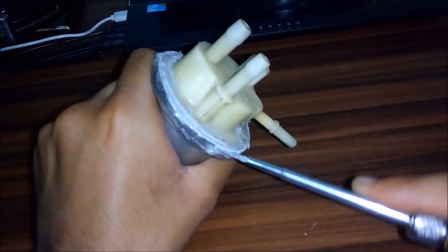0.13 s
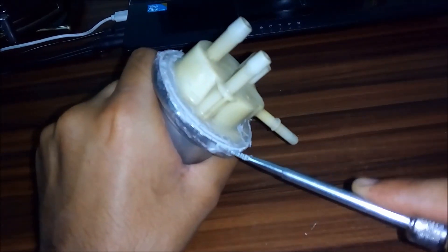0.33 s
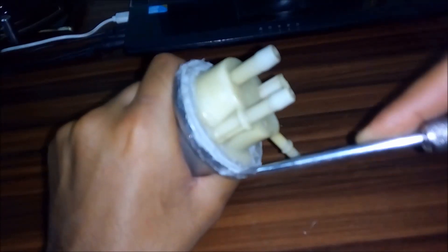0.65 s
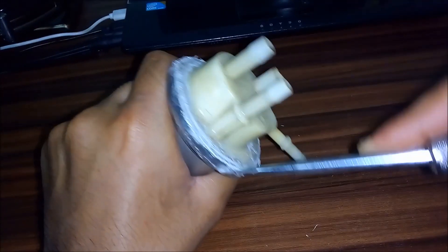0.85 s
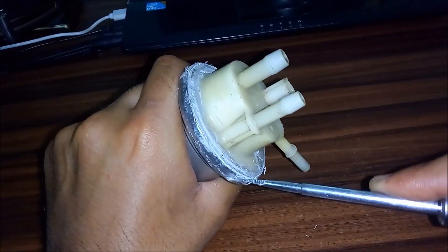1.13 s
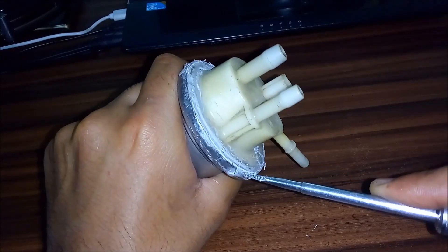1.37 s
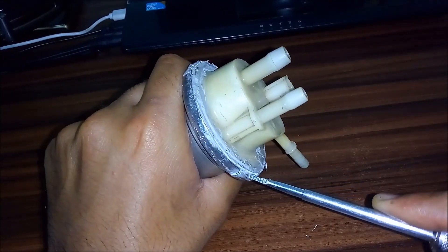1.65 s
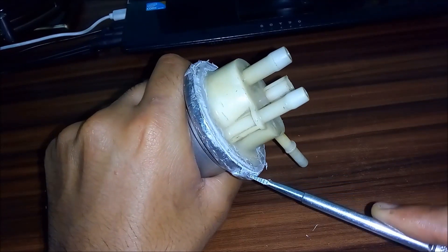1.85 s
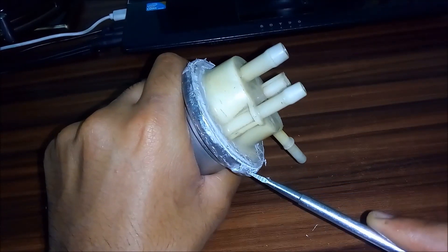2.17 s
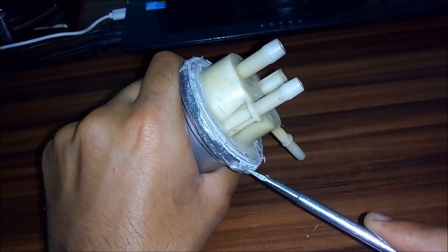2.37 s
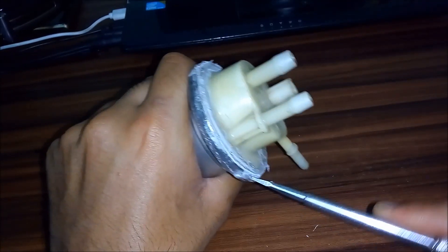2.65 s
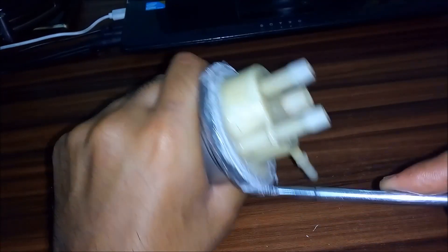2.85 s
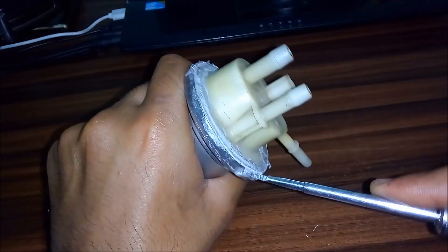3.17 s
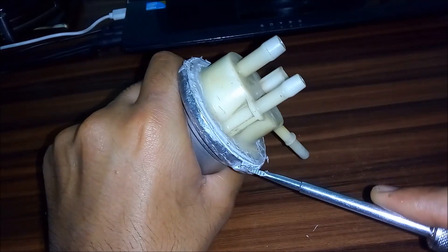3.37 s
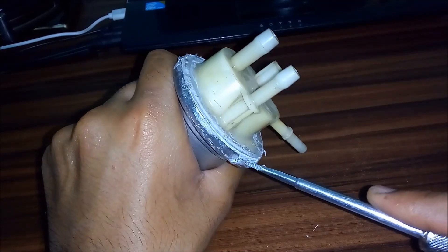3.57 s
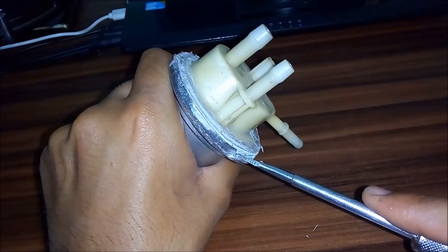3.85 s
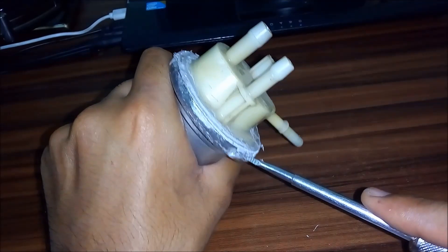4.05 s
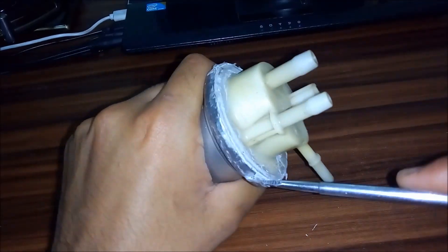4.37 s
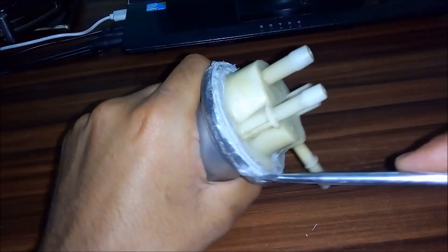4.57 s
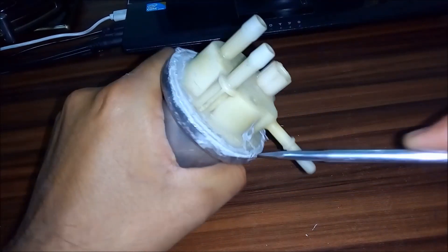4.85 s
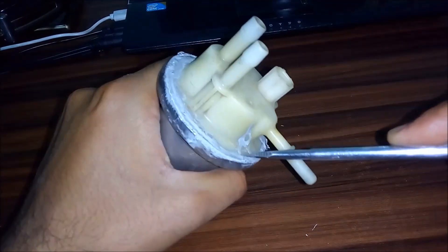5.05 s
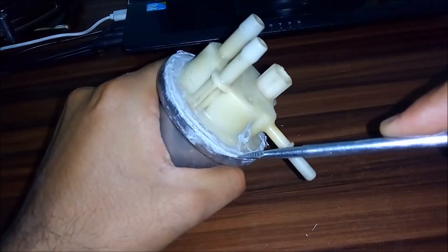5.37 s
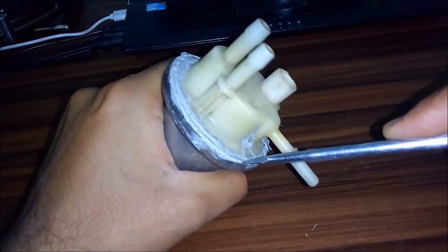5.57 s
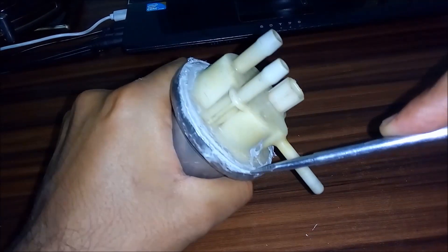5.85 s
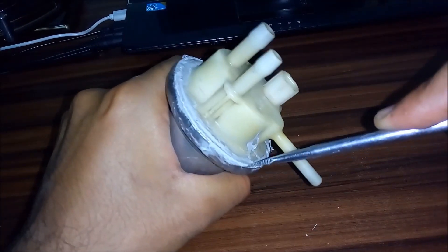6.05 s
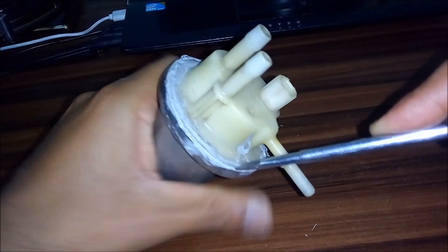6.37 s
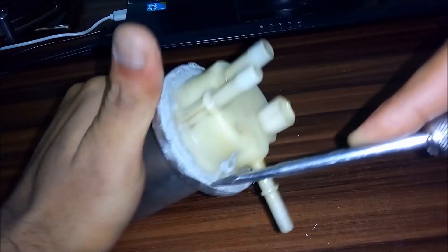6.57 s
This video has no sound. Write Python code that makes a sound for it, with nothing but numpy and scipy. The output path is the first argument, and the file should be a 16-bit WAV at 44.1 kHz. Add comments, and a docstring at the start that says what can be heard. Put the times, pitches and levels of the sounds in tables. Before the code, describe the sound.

A nearby stereo microphone catches short hard steel clicks with brief ring, dry gritty scrapes of a blade tip, and boomy wooden knocks as a pump rocks on a desk. It starts sparsely, with quiet gaps, peaks in one sharp crack and one loud thump, becomes busy with knocks and juddering scrapes, then thins to small ticks and a last soft bump. Low room noise and hiss continue.

```python
"""Prying at a steel rim

A flat screwdriver pries at the crimped steel rim of a small pump held on a wooden desk, close to a phone.
Bright clicks are short pushes that set off a crack and a steel ring; the blade also rubs, rasps and taps.
The pump knocks and drags on the desk, which booms in a small room, and the hand bumps softly.
Under it lie a faint room rumble and the hiss of two microphones, all made from filtered noise."""
import sys
import numpy as np
from scipy import signal
from scipy.fft import rfft, irfft
from scipy.io import wavfile

SR = 44100
rng = np.random.default_rng(int(sys.argv[2]) if len(sys.argv) > 2 else 0)


def materialize(psi):
    """Save the field psi as 16-bit PCM at rate SR to the path in sys.argv[1].

    A 1-D psi becomes a single channel; in a 2-D psi each row is a channel.
    """
    bounded = np.clip(np.atleast_2d(psi).T, -1, 1)
    quanta = np.round(bounded * 32767).astype(np.int16)
    wavfile.write(sys.argv[1], SR, quanta)


N = 295934  # length of the scene in samples
RING = 32768  # length of one response in samples
T = np.arange(RING) / SR
HZ = np.maximum(np.arange(RING // 2 + 1) * SR / RING, 1)


def undb(db):
    """Turn decibels into a gain."""
    return 10 ** (np.asarray(db) / 20)


def add(track, start_s, sound):
    """Mix a sound into the track at start_s seconds."""
    start = max(int(start_s * SR), 0)
    track[:, start:start + sound.shape[1]] += sound[:, :N - start]


def pan(left_minus_right_db):
    """Gains of the two microphones for a left-minus-right difference."""
    return undb(np.array([[left_minus_right_db], [-left_minus_right_db]]) / 2)


def fade(t60_s, t=T):
    """Exponential decay that falls by 60 dB in t60_s seconds."""
    return np.exp(-np.log(1000) * t / t60_s)


def spectrum(points, hz):
    """Join (pitch_hz, level_db) points into a curve on a log-frequency axis."""
    at_hz, level_db = np.transpose(points)
    return np.interp(np.log(np.maximum(hz, 1)), np.log(at_hz), level_db)


def noise(points, size, channels=2):
    """Unrelated rows of noise, coloured by a spectrum."""
    hz = np.arange(size // 2 + 1) * SR / size
    white = rng.standard_normal((channels, size))
    return irfft(rfft(white) * undb(spectrum(points, hz)), size)


def pulse(level_db):
    """The most compact pulse that starts at time zero and has these levels over HZ (minimum phase)."""
    cepstrum = irfft(level_db * np.log(10) / 20)
    # doubling the first half and dropping the second leaves nothing before time zero
    fold = 1 + np.sign(RING / 2 - np.arange(RING)) * (T > 0)
    return irfft(np.exp(rfft(cepstrum * fold)))


def through(x, response):
    """Send a sound through a response (convolution along time)."""
    return signal.fftconvolve(np.atleast_2d(x), np.atleast_2d(response), axes=1)


def contact(tilt_db, pivot_hz, cut_hz, q):
    """Push of one contact: more tilt is brighter; bass falls off below a resonance of sharpness q."""
    slope_db = tilt_db * np.clip(np.log2(HZ / pivot_hz), -3, 3)
    ratio = cut_hz / HZ
    bass_loss_db = 10 * np.log10((1 - ratio ** 2) ** 2 + (ratio / q) ** 2)
    return pulse(slope_db - bass_loss_db)


def rounded(push, top_hz, order):
    """A longer contact takes away the treble above top_hz."""
    treble_loss_db = 10 * np.log10(1 + (HZ / top_hz) ** (2 * order))
    return through(push, pulse(-treble_loss_db))[:, :RING]


def ring(modes, shift_s=0):
    """Sum of decaying modes; neighbours start in opposite directions, and shift_s moves them opposite ways."""
    total = 0
    for k, (hz, level_db, t60_s) in enumerate(modes):
        sign = (-1) ** k
        swing = np.sin(2 * np.pi * hz * (T + sign * shift_s))
        total = total + sign * undb(level_db) * swing * fade(t60_s)
    return total


def ports(x, lag_s):
    """The sound reaches the right microphone lag_s after the left."""
    return np.array([x, np.interp(T - lag_s, T, x, left=0)])


def room_tail(points, build_s, alike_hz=1300):
    """Dense reflections build up and die, the treble sooner; only the bass is alike at both microphones."""
    room_t60_s, treble_t60_s = 0.52, 0.34
    left, other = rfft(noise(points, RING))
    alike = 1 / (1 + (HZ / alike_hz) ** 2)
    field = np.array([left, alike * left + np.sqrt(1 - alike ** 2) * other])
    bass = 1 / (1 + (HZ / 2000) ** 2)
    tail = irfft(field * bass) * fade(room_t60_s) + irfft(field * (1 - bass)) * fade(treble_t60_s)
    return tail * (1 - np.exp(-T / build_s))


def stick_slip(per_s, scatter_db):
    """Friction force of unit power: tiny catches at random moments, in either direction and of uneven size."""
    caught = rng.random(RING) < per_s / SR
    direction = rng.choice([-1, 1], RING)
    catches = caught * direction * undb(scatter_db * rng.standard_normal(RING))
    return catches / np.std(catches)


def stroke_level(sound, level_db, length_s):
    """Scale a stroke so that its energy, spread over its length, has this level."""
    energy = np.mean(np.sum(sound ** 2, axis=1))
    return sound * undb(level_db) / np.sqrt(energy / (length_s * SR))


def rim_clicks(echo_s=0.0021, echo_db=-13, room_db=0, chatter_db=-26, chatter_s=0.0045):
    """The blade lets go of the rim: a hard crack, brief chatter, an echo off the desk, steel ring and room."""
    # blade slips: start_s, level_db, tilt_db_per_octave, contact_hz (resonance), top_hz (treble limit),
    # left_minus_right_db (before the right-hand shade), ring_db (ring, room and chatter against the crack)
    slips = [(0.014, -48, 12, 6500, 7900, 32, 2.5), (0.2210, -22.5, 3.5, 2360, 14900, 3.5, 1.5),
             (0.357, -44.5, 9, 2980, 11000, 13, 6), (1.235, -48, 2.5, 2730, 6950, 5, 11),
             (2.3694, -5.5, -1.5, 550, 14000, 3, 0), (2.988, -30, 10.5, 7820, 7660, 11.5, 4),
             (3.576, -46.5, 0.5, 6700, 11150, 1.5, 2.5), (3.7996, -15, 1, 1860, 14700, 6, 0.5),
             (4.213, -15, 1.5, 1500, 18400, -4.5, 4), (4.2144, -32, 15.5, 2190, 15000, 11, 8.5),
             (4.2641, -36.5, 0, 2050, 9100, 0, 14), (5.231, -46.5, -6, 4800, 8000, 1.5, 5.5),
             (5.5987, -42, 2, 2510, 11000, 7.5, 6), (5.918, -51, 2, 7150, 10900, 0.5, -2),
             (6.577, -42.5, -9, 6800, 8000, 1, 7)]
    # ringing of rim and blade: pitch_hz, level_db, t60_s (time to fall by 60 dB)
    steel_modes = [(1710, -39.5, 0.12), (1960, -36.5, 0.024), (1703, -45, 0.25), (2420, -52.5, 0.03),
                   (2600, -38, 0.014), (3200, -38, 0.019), (4270, -38, 0.031), (3940, -35, 0.031),
                   (4010, -52, .33), (4013, -55.5, 0.32), (4830, -52, 0.017), (5160, -37.5, 0.045),
                   (5670, -37, 0.06), (6000, -48.5, 0.042), (6500, -37.5, 0.13), (5970, -54, .2),
                   (7250, -46, 0.04), (6700, -46, 0.11)]
    # first crack of the rim, also the colour of its chatter: pitch_hz, level_db
    crack_colour = [(200, -67), (1100, -60), (2000, 2), (3000, -23), (4100, 1.5), (5200, 4), (6400, 16.5),
                    (7200, 13), (8000, -1.5), (9200, -14.5), (15000, -11.5)]
    # room tail after a click: pitch_hz, level_db
    tail_colour = [(100, -21), (250, -24), (600, -45), (1200, -49.5), (1750, -40), (3000, -43), (4000, -33),
                   (4600, -38), (6600, -25), (7400, -31), (8800, -61.5), (15000, -56)]
    # the right microphone faces away from the rim and misses part of its treble: pitch_hz, level_db
    right_shade = [(4500, 4), (5500, -2.5), (6500, -8), (7500, -10), (9000, -1)]
    # a firm blade damps the contact: firm_q is the sharpness at 0 dB, doubled for every 10 dB less
    firm_q, q_doubling_db = 0.18, 10
    lag_s = 0.000035
    out = np.zeros((2, N))
    crack = pulse(spectrum(crack_colour, HZ))
    echo = undb(echo_db) * np.interp(T - echo_s, T, crack, left=0)
    snap = ports(crack + echo, lag_s)
    room = undb(room_db) * room_tail(tail_colour, build_s=0.0038)
    rings = ports(ring(steel_modes), lag_s) + room
    for start_s, level_db, tilt_db, contact_hz, top_hz, pan_db, ring_db in slips:
        chatter = undb(chatter_db) * noise(crack_colour, RING) * np.exp(-T / chatter_s)
        q = firm_q * 2 ** (-level_db / q_doubling_db)
        push = rounded(contact(tilt_db, 7200, contact_hz, q), top_hz, order=4)
        response = snap + undb(ring_db) * (rings + chatter)
        add(out, start_s, undb(level_db) * pan(pan_db) * through(push, response))
    shaded_right = through(out[1], pulse(spectrum(right_shade, HZ)))[0, :N]
    return np.array([out[0], shaded_right])


def rubs(width_hz=35, lag_s=0.00006):
    """Steel catching on steel keeps two bending modes of the blade faintly alive; each rub bites, then eases."""
    # blade rubs along the rim, its ring sliding with the contact:
    # start_s, length_s, pitch_hz, slide_hz_per_s, level_db
    strokes = [(0, 0.32, 1610, -380, -66.5), (0.295, .12, 1530, -1700, -69), (0.818, 0.54, 1600, -350, -82),
               (3.064, 0.083, 1730, 6, -75), (4.622, 0.6, 1720, 11, -77), (5.388, 0.083, 1700, 4, -77.5)]
    attack_s = 0.0054
    upper_ratio, upper_db = 1.17, -12  # second bending mode against the first
    out = np.zeros((2, N))
    for start_s, length_s, hz, slide_hz_per_s, level_db in strokes:
        pressure = np.minimum(T / attack_s, 1) * np.sqrt(np.maximum(1 - T / length_s, 0))
        force = pressure * stick_slip(per_s=1500, scatter_db=2)
        swing = through(force, np.exp(-np.pi * width_hz * T))[0, :RING]
        phase = 2 * np.pi * np.cumsum(hz + slide_hz_per_s * T) / SR
        modes = np.sin(phase) + undb(upper_db) * np.sin(upper_ratio * phase)
        add(out, start_s, stroke_level(ports(swing * modes, lag_s), level_db, length_s))
    return out


def burrs(length_s, hz, spread_octaves):
    """The tip skips from burr to burr; each spot rings briefly at a pitch of its own."""
    burrs_per_s, t60_s, scatter_db = 480, 0.018, 3.5
    out = np.zeros((1, N))
    t = T[:int(t60_s * SR)]
    count = int(length_s * burrs_per_s) + 1
    chance = rng.standard_normal((256, 3))
    for k, (shift, detune, size) in enumerate(chance[:count]):
        start_s = (k + 0.5 * shift) / burrs_per_s
        # pressure swells and eases over the stroke
        pressure = np.sqrt(np.sin(np.pi * (k + 0.5) / (length_s * burrs_per_s + 1)))
        spot_hz = hz * 2 ** (spread_octaves * detune)
        spot = np.sin(2 * np.pi * spot_hz * t) * fade(t60_s, t)
        add(out, start_s, pressure * undb(scatter_db * size) * spot[None])
    return out[:, :RING]


def tip(lag_s=0.00003, room_db=-34):
    """The blade's tip rasps over burrs and its edge taps the rim lightly, heard close and from the room."""
    # rasps over burrs on the rim: start_s, length_s, centre_hz, spread_octaves, level_db
    rasps = [(0, 0.075, 1817, 0.17, -58.5), (0.005, 0.13, 4020, 0.15, -68), (0.682, 0.02, 1850, 0.19, -58),
             (0.833, 0.17, 1730, 0.12, -76), (3.194, 0.033, 1740, 0.37, -57),
             (4.406, 0.052, 2160, 0.32, -55), (4.458, 0.028, 1800, 0.28, -64),
             (4.496, 0.041, 1915, 0.45, -58.5), (4.579, 0.012, 1500, 0.21, -62.5),
             (4.657, 0.065, 1220, 0.34, -67), (4.788, 0.091, 1665, 0.3, -51.5),
             (4.947, 0.044, 1910, 0.38, -57), (4.795, 0.094, 3100, 0.17, -60),
             (4.781, 0.082, 6170, .15, -61), (4.953, 0.036, 6250, 0.079, -63),
             (5.406, 0.018, 6300, 0.2, -65), (6.209, 0.1, 3810, 0.36, -78.5)]
    # light taps of the edge: start_s, pitch_hz, level_db (start of the ring, before panning)
    ticks = [(4.436, 1690, -36.5), (4.436, 3200, -48.5), (4.805, 4480, -42.5), (4.8098, 3150, -41.5),
             (5.072, 3430, -51), (5.23, 1680, -45), (5.2302, 3480, -48.5), (5.4098, 3060, -56),
             (5.5258, 2600, -54)]
    tick_t60_s, tick_left_minus_right_db = 0.013, -7.5
    out = np.zeros((2, N))
    direct = ports(1. * (T == 0), 0)
    air = direct + room_tail([(1000, room_db)], build_s=0.0027)
    for start_s, length_s, hz, spread_octaves, level_db in rasps:
        rasp = ports(burrs(length_s, hz, spread_octaves)[0], lag_s)
        add(out, start_s, stroke_level(through(rasp, air), level_db, length_s))
    for start_s, hz, level_db in ticks:
        tick = ports(ring([(hz, level_db, tick_t60_s)]), lag_s)
        add(out, start_s, pan(tick_left_minus_right_db) * through(tick, air))
    return out


def desk(room_db=0, right_db=-1.16, chatter_db=-24, chatter_s=0.0065):
    """Response of pump, desk and room to one push: crack, chatter, slow boom and room tail."""
    # plastic pump housing: pitch_hz, level_db, t60_s
    pump_modes = [(531.7, -22, 0.056), (930, -39, 0.075), (1080, -14, 0.00282), (1586, -33.5, 0.024),
                  (2275, -36.5, 0.016), (3094, -30.5, 0.012), (6244, -56.5, 0.017)]
    # desk top and the air around it: pitch_hz, level_db, t60_s
    desk_modes = [(83.4, -40.5, 0.65), (111, -28, 0.47), (152, -32.5, 0.48), (160, -29, 0.42),
                  (200.6, -49, 0.66), (243.8, -38, 0.45), (273.2, -30.5, 0.5), (326, -47, 0.18),
                  (310.5, -42, 0.3), (344, -36.5, 0.33), (365.4, -38, .3), (380, -30.5, 0.24),
                  (451, -38, 0.3), (479, -36, 0.13), (514, -34, 0.42), (579.2, -36, 0.22),
                  (674.6, -41.5, 0.43), (747, -42.5, 0.39), (792, -37.5, 0.38), (869, -43.5, 0.46),
                  (920, -43.5, 0.3), (953, -44, 0.24), (1072, -44.5, 0.18), (1139, -47.5, 0.2),
                  (1300, -47.5, 0.3), (1513, -46, 0.28), (2210, -50.5, 0.3)]
    # first crack of the desk, also the colour of its chatter: pitch_hz, level_db
    crack_colour = [(60, -8.5), (200, 20), (500, 2), (1100, 17), (2000, 4), (3200, -2), (4300, -20),
                    (7000, -33.5), (9000, -38), (15000, -52)]
    # room tail after a push on the desk: pitch_hz, level_db
    tail_colour = [(30, -17), (60, -21.5), (100, -14.5), (300, -20.5), (550, -15), (680, -22), (950, -23.5),
                   (1400, -30.5), (2000, -32), (3000, -40.5), (4500, -50), (7000, -42), (9000, -81),
                   (15000, -96)]
    # the desk top first gives way, so a knock starts with a dip in pressure
    crack = ports(ring(pump_modes) - pulse(spectrum(crack_colour, HZ)), lag_s=0.00007)
    chatter = undb(chatter_db) * noise(crack_colour, RING) * np.exp(-T / chatter_s)
    # the wide desk top takes a moment to start swinging
    boom = np.array([ring(desk_modes), ring(desk_modes, shift_s=0.00026)]) * (1 - np.exp(-T / 0.0046))
    room = undb(room_db) * room_tail(tail_colour, build_s=0.02, alike_hz=688)
    return (crack + chatter + boom + room) * undb([[0], [right_db]])


def knocks(wood, shudder_pan_db=4):
    """The pump is jolted or rocks against the desk: the harder the knock, the shorter and brighter the push."""
    # knocks on the desk: start_s, level_db, low_cut_hz, cut_sharpness
    hits = [(0.028, -25.5, 70, 0.65), (0.623, -46, 200, .7), (0.733, -31, 227, 1.6),
            (0.837, -38.5, 380, 1.3), (0.917, -42, 200, 2.3), (3.2155, 0.5, 67.4, 0.92),
            (4.147, -21, 160, 1.07), (4.2644, -4, 150, 0.96), (4.382, -24.5, 450, 0.54),
            (4.501, -29.5, 170, 2.3), (4.578, -23, 400, 0.93), (4.664, -36, 300, 0.94),
            (5.0608, -9.5, 120, 0.4), (5.2135, -10, 106, 0.89), (5.546, -47, 160, 1.7),
            (5.603, -40, 380, 0.81), (6.648, -23.5, 150, 0.89)]
    # a knock is also followed by a low rumble that dies away slowly: pitch_hz, level_db
    shudder_colour = [(15, -27.5), (45, -20), (70, -23.5), (130, -48), (500, -100)]
    shudder_t60_s = 0.66
    # tilt in dB per octave at 0 dB, and its change per dB of level
    tilt_at_0_db, tilt_per_db = 0.5, 0.1945
    # a softer knock stays longer in contact: its treble ends an octave lower for every octave_db less
    top_hz_at_0_db, octave_db = 4300, 14.5
    out = np.zeros((2, N))
    for start_s, level_db, cut_hz, q in hits:
        tilt_db = tilt_at_0_db + tilt_per_db * level_db
        top_hz = top_hz_at_0_db * 2 ** (level_db / octave_db)
        push = rounded(contact(tilt_db, 580, cut_hz, q), top_hz, order=2)
        shudder = noise(shudder_colour, RING, channels=1) * fade(shudder_t60_s)
        knock = through(push, wood)[:, :RING] + pan(shudder_pan_db) * shudder
        add(out, start_s, undb(level_db) * knock)
    return out


def drags(wood):
    """The housing catches and slips on the wood as it is pushed, juddering on the springy grip of the hand."""
    # one drag a row: judder_hz, tilt_db_per_octave, curve of the push as (time_s, level_db above 700 Hz)
    pushes = [(256, 1.5, [(0.0, -48.5), (0.026, -54), (0.202, -71.5), (0.224, -65.5), (0.272, -73),
              (0.34, -63.5)]), (160, 0, [(0.59, -98), (0.614, -68.5), (0.652, -77), (0.68, -57),
              (0.692, -52.5), (0.71, -76), (0.81, -76), (0.93, -71), (1.0, -84), (1.28, -83.5)]),
              (150, 1.5, [(2.74, -77), (2.788, -60.5), (2.88, -77.5)]), (155, 0.5, [(4.37, -48),
              (4.406, -63.5), (4.448, -56.5), (4.485, -50.5), (4.56, -53.5), (4.62, -73), (4.66, -65.5),
              (4.71, -71)]), (520, 3, [(4.405, -54), (4.425, -45), (4.437, -59.5), (4.445, -65)]),
              (265, 0.5, [(4.76, -66), (4.78, -49), (4.795, -47), (4.862, -45.5), (4.885, -48.5),
              (4.9, -62)]), (290, 2.5, [(4.942, -57), (4.946, -47.5), (4.98, -44), (4.99, -59)]),
              (258, 1.5, [(5.53, -92), (5.6, -73), (5.68, -85)]), (136, 1.3, [(6.56, -80), (6.57, -69.5),
              (6.62, -74.5), (6.644, -54.5), (6.7, -59)])]
    # colour that the grain of the wood gives to a drag: pitch_hz, level_db
    grain = [(300, 4), (700, -1), (1600, 0.5), (2500, -3.5), (3300, -1.5), (4500, 9), (7000, 5.5),
             (10000, -14)]
    judder_q, catches_per_s, catch_scatter_db, scrape_hz = 1.4, 1100, 4, 700
    out = np.zeros((2, N))
    grainy = through(pulse(spectrum(grain, HZ)), wood)[:, :RING]
    for judder_hz, tilt_db, curve in pushes:
        time_s, level_db = np.transpose(curve)
        push_db = np.interp(time_s[0] + T, time_s, level_db)
        moving = T < time_s[-1] - time_s[0]
        force = stick_slip(catches_per_s, catch_scatter_db) * undb(push_db) * moving
        body = through(contact(tilt_db, 600, judder_hz, judder_q), grainy)[:, :RING]
        # scale the body so that the curve sets the level above scrape_hz
        scrape_gain = np.sqrt(np.mean(np.abs(rfft(body)) ** 2 * (HZ > scrape_hz)))
        add(out, time_s[0], through(force, body / scrape_gain))
    return out


def bumps():
    """The hand shifts its grip: soft flesh gives a few low swings and no ring."""
    # soft bumps of the hand: start_s, length_s, pitch_hz, level_db
    grips = [(0.352, 0.04, 138, -43.5), (0.358, 0.058, 66, -49), (0.43, 0.034, 102, -51.5),
             (6.654, 0.042, 87, -50), (6.665, 0.036, 160, -47)]
    out = np.zeros((2, N))
    for start_s, length_s, hz, level_db in grips:
        size = int(length_s * SR)
        swing = np.hanning(size) * np.sin(2 * np.pi * hz * T[:size])
        add(out, start_s, undb(level_db) * swing[None])
    return out


def background():
    """Room rumble shared by both microphones, their own hiss, and a brighter band of hiss on the left."""
    # noise colours: pitch_hz, level_db (against white noise of unit power)
    rumble = [(20, -84), (45, -60), (70, -55.5), (110, -56.5), (200, -59), (450, -68), (1000, -83),
              (3000, -86.5), (9000, -100)]
    # hiss of each microphone: pitch_hz, level_db (same reference)
    hiss = [(20, -85.5), (100, -54), (1500, -69.5), (4500, -70), (6000, -71.5), (8200, -83.5),
            (14500, -82.5)]
    # extra hiss on the left: pitch_hz, level_db (same reference)
    left_hiss = [(4000, -105), (4900, -72), (5400, -58.5), (6000, -54), (6400, -60.5), (6900, -52),
                 (7300, -50), (7600, -62.5), (7900, -63), (8400, -100)]
    left_only = np.array([[1], [0]])
    return noise(rumble, N, channels=1) + noise(hiss, N) + left_only * noise(left_hiss, N, channels=1)


def scene():
    """Steel clicks and wooden knocks over the quiet room."""
    wood = desk()
    steel = rim_clicks() + rubs() + tip()
    pump = knocks(wood) + drags(wood)
    return steel + pump + bumps() + background()


def record(dry):
    """The phone cuts the treble above 15500 Hz with a steep low-pass filter."""
    # order 8, ripple 0.2 dB below the cut, at least 70 dB down beyond it
    low_pass = signal.ellip(8, 0.2, 70, 15500, fs=SR, output="sos")
    return signal.sosfilt(low_pass, dry)


dry = scene()
out = record(dry)
materialize(out)
```